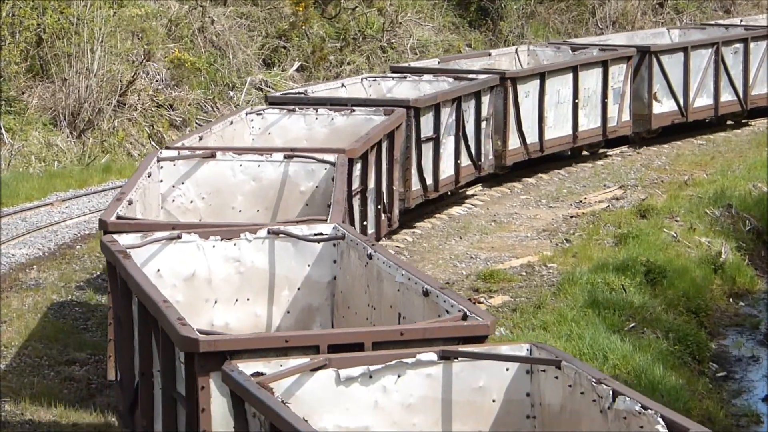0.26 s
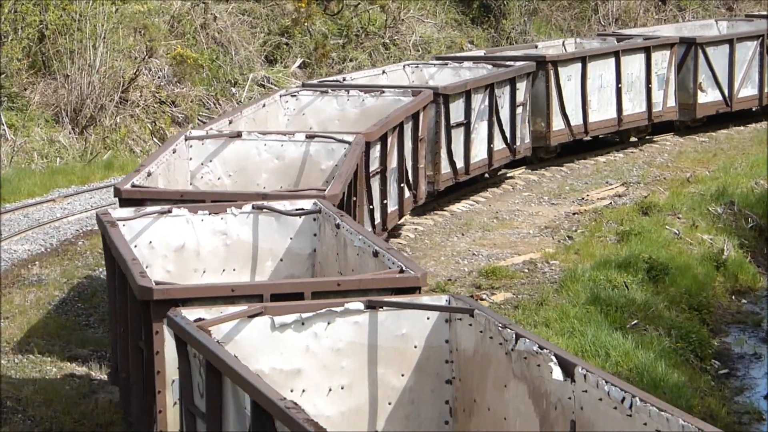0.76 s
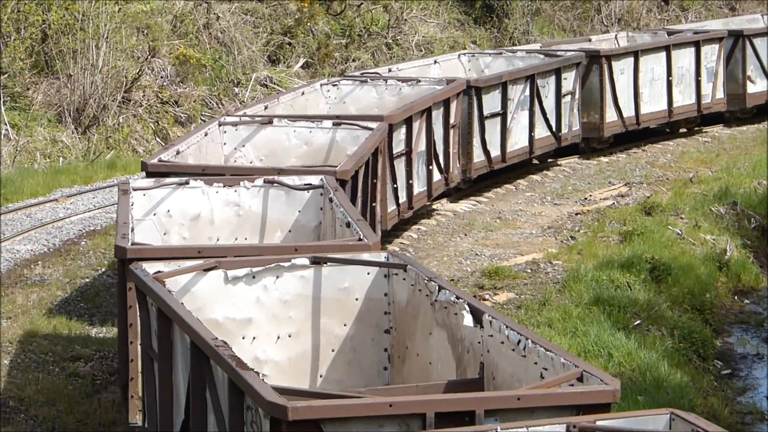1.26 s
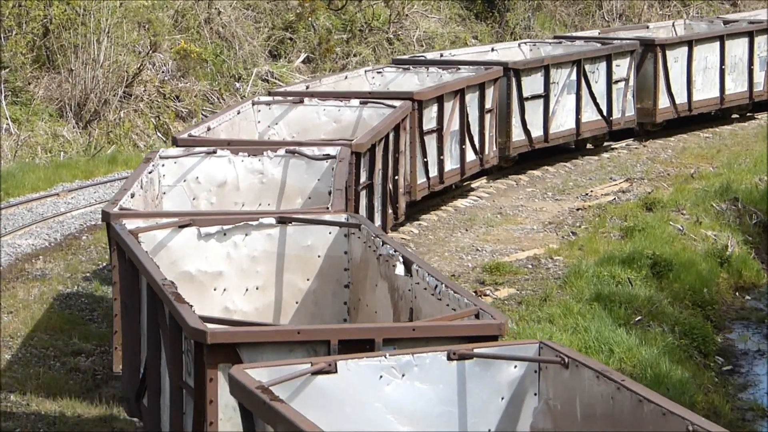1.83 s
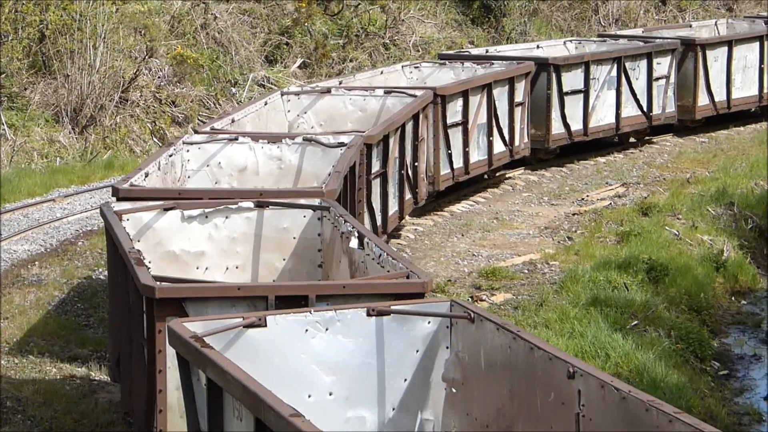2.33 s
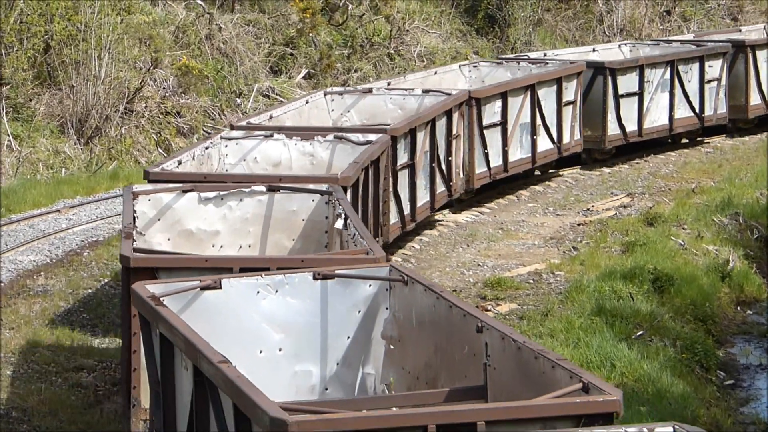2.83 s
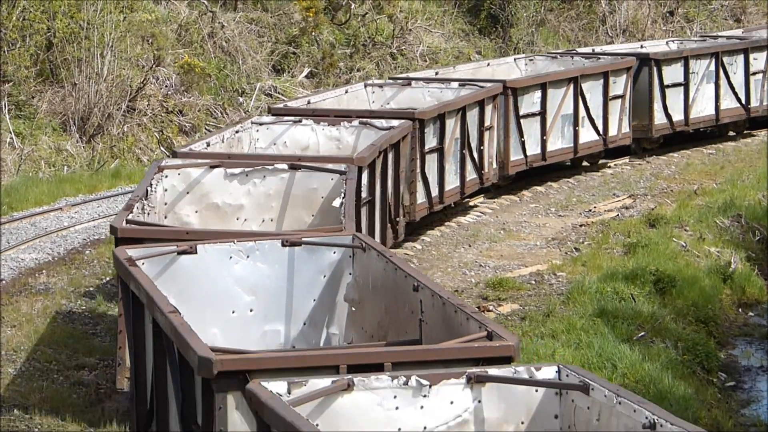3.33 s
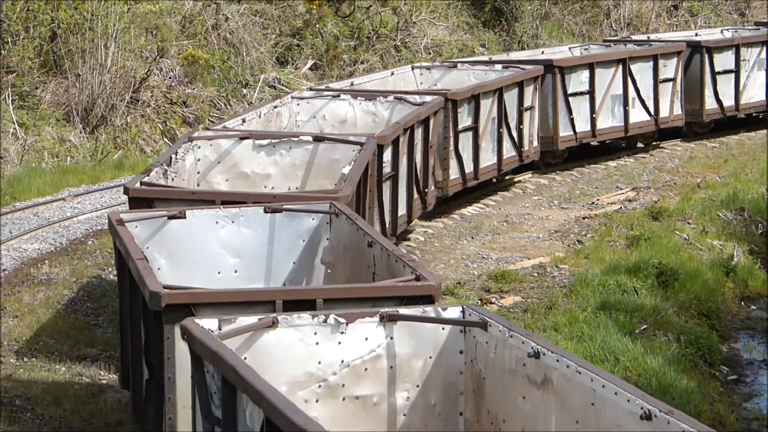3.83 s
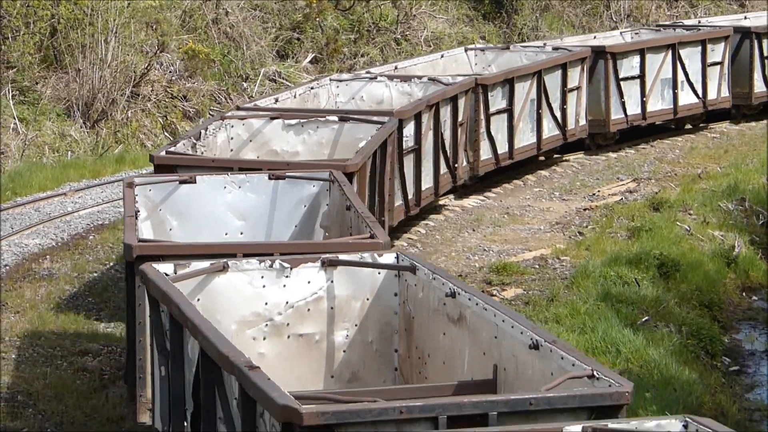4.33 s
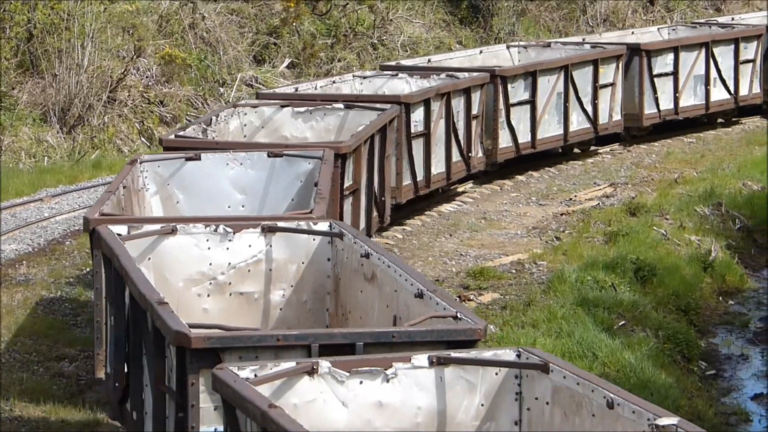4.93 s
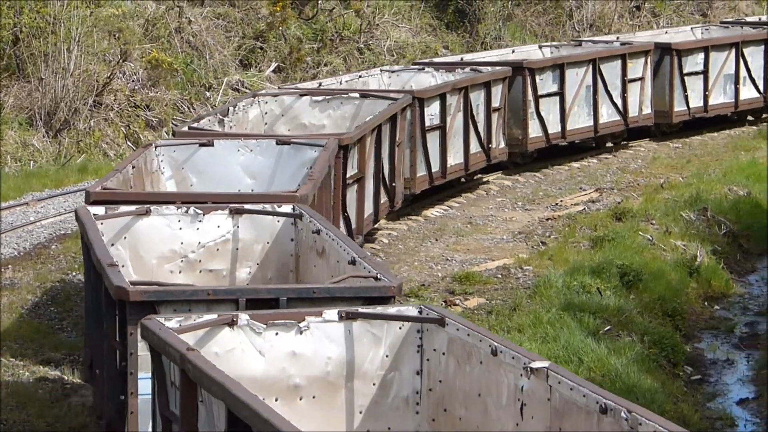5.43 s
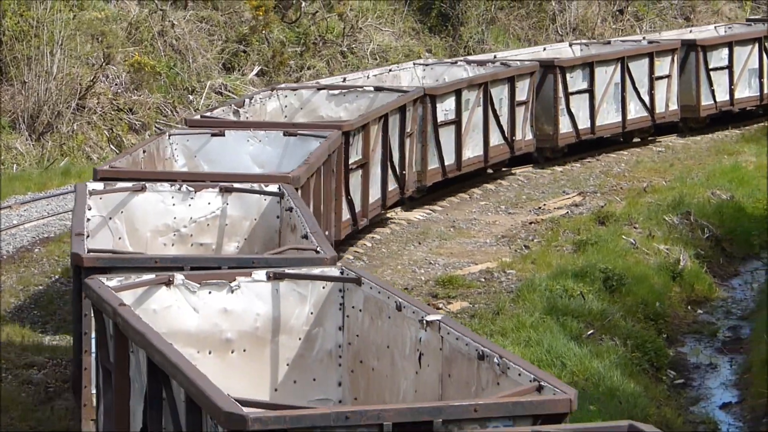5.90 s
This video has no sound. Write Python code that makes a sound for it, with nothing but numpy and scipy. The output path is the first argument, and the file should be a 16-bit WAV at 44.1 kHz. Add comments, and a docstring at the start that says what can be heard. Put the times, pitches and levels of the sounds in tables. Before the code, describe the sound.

Empty steel freight wagons clatter past close by, wheels roaring and ringing, loose plates and couplings clanking irregularly, with gusty wind buffeting the microphone.

```python
"""Empty hopper wagons on a curve

In the open air, a camera's two close microphone ports look down on steel hopper wagons a few metres below.
Wheels roar, ring and knock on the rails: random contacts and blows excite damped modes and coloured responses.
Jolts clank frames, plates and couplings, loose parts rattle and tick, and the empty bodies boom softly.
Flanges rub the rail in short, noisy bursts or sing faintly as gliding tones; shaped noise is the gusty wind.
"""
import sys
import numpy as np
from scipy import signal
from scipy.fft import rfft, irfft
from scipy.io import wavfile
from scipy.ndimage import uniform_filter1d, map_coordinates

SR = 44100
rng = np.random.default_rng(int(sys.argv[2]) if len(sys.argv) > 2 else 0)


def materialize(psi):
    """Save the field psi as 16-bit PCM at rate SR to the path in sys.argv[1].

    A 1-D psi becomes a single channel; in a 2-D psi each row is a channel.
    """
    bounded = np.clip(np.atleast_2d(psi).T, -1, 1)
    quanta = np.round(bounded * 32767).astype(np.int16)
    wavfile.write(sys.argv[1], SR, quanta)


N = 271656
TIME = np.arange(N) / SR


def undb(db):
    """Decibels to gain."""
    return 10 ** (np.asarray(db) / 20)


def unit(x):
    """Scale to rms 1."""
    return x / np.sqrt(np.mean(x ** 2))


def curves(table):
    """Each column after the first as a curve over time, joined by straight lines."""
    s, *columns = np.transpose(table)
    return [np.interp(TIME, s, column) for column in columns]


def fade(t, t60):
    """Exponential decay by 60 dB in t60 seconds."""
    return np.exp(-np.log(1000) * t / t60)


def walk(rate):
    """Smooth random wander of rms 1, drawn afresh rate times per second."""
    hold = int(SR / rate)
    steps = np.repeat(rng.standard_normal(N // hold + 1), hold)
    return unit(uniform_filter1d(steps, hold)[:N])


def pan(db):
    """Gains that make the left louder than the right by db."""
    return undb(np.array([[db], [-db]]) / 2)


def colour(points, size=2048):
    """Minimum-phase response of unit energy with the given spectrum."""
    hz, db = np.transpose(points)
    f = np.maximum(np.fft.rfftfreq(size, 1 / SR), 1)
    level_db = np.interp(np.log(f), np.log(hz), db)
    cepstrum = irfft(np.log(undb(level_db)))
    # folding the cepstrum onto positive time makes the response causal
    cepstrum[1:size // 2] *= 2
    cepstrum[size // 2 + 1:] = 0
    response = irfft(np.exp(rfft(cepstrum)))
    return response / np.linalg.norm(response)


def through(x, response):
    """Pass a sound through a response."""
    return signal.fftconvolve(x, response)[:N]


def contacts(rate, scatter_db):
    """Random metal-on-metal clicks, rate per second on average, of uneven size; rms 1."""
    struck = rng.random(N) < rate / SR
    size = undb(scatter_db * np.clip(rng.standard_normal(N), -2, 2))
    return unit(struck * size * rng.choice([-1, 1], N))


def flurries(rate, t60, steady_db):
    """Strength of a loose part that bounces at uneven gaps, each bounce a short cluster of contacts; rms 1."""
    gaps, sizes = rng.random((N // 100, 2)).T
    starts = (np.cumsum(.5 + gaps) * SR / rate).astype(int)
    bounces = np.bincount(starts, sizes ** 2)[:N]
    bounces = np.pad(bounces, (0, N - len(bounces)))
    power = np.abs(through(bounces, fade(TIME[:SR // 4], t60) ** 2))
    return unit(np.sqrt(power / power.mean() + undb(steady_db) ** 2))


def part(hz, db, ring_t60, ring_db, side_db, count=90):
    """Left and right response of one steel part: a crack, modes that ring on, scatter off the wagon walls."""
    t = TIME[:SR // 4]
    tone = colour(np.transpose([hz, db]))
    mode_hz = rng.uniform(hz[1], hz[-3], (count, 1))
    phase = 2 * np.pi * (mode_hz * t + rng.random((count, 1)))
    modes = np.sum(np.sin(phase), axis=0) * fade(t, ring_t60)
    mid = undb(ring_db) * unit(through(modes, tone)[:len(t)]) / np.sqrt(len(t))
    mid[:len(tone)] += tone  # the crack
    scatter = rng.standard_normal(len(t)) * fade(t, 0.048)
    side = undb(side_db) * unit(through(scatter, tone)[:len(t)])
    return (unit(mid) + np.array([side, -side])) / np.sqrt(len(t))


def steel(force, points, ring_t60, ring_db, side_db, patchy_db, count=8):
    """Several alike parts, each a little off the common colour, take turns to be struck."""
    hz, db = np.transpose(points)
    patches = patchy_db * rng.standard_normal((count, len(hz)))
    patches -= patches.mean(axis=0)
    struck = np.argmax([walk(rate=18) + .5 * rng.random(N) for _ in range(count)], axis=0)
    out = np.zeros((2, N))
    for k, patch in enumerate(patches):
        response = part(hz, db + patch, ring_t60, ring_db, side_db)
        out += signal.oaconvolve([force * (struck == k)], response, axes=1)[:, :N]
    return out


# rolling, before the gains of each layer: time_s, roar_db of the wheels, rattle_db of the loose parts
ROLLING = [(0.0, -25, -34.5), (0.12, -28.5, -34), (0.7, -31.5, -37), (0.94, -30, -37.5), (1.42, -32, -34),
           (1.58, -37, -41.5), (1.82, -37.5, -36), (2.26, -33.5, -35), (2.66, -33, -38), (3.0, -35, -37.5),
           (3.29, -35, -40), (3.71, -38, -43.5), (3.92, -36.5, -42), (4.15, -31.5, -37.5),
           (4.49, -28.5, -36), (4.99, -31.5, -37), (5.23, -31, -35.5), (5.41, -34.5, -40.5),
           (5.56, -31, -37), (6.16, -30, -37)]
# colour of the wheels: frequency_hz, relative level_db per Hz
WHEEL_COLOUR = [(400, -29), (640, -8), (710, -8), (850, 1.5), (950, 0), (1090, 1.5), (1280, -2),
                (1420, -4.5), (1650, -8), (1900, -13.5), (2470, -16), (4180, -100)]
# colour of the loose body plates: frequency_hz, relative level_db per Hz
PLATE_COLOUR = [(1120, -20.5), (1800, 0), (2000, 0.5), (2280, 4), (2600, -4), (2920, 3), (3250, 2.5),
                (3560, 4), (3950, -1), (4180, -3.5), (4410, -11), (4800, -5.5), (5200, -17.5), (6760, -58),
                (11400, -120)]
# colour of the loose chains: frequency_hz, relative level_db per Hz
CHAIN_COLOUR = [(3000, -30), (5200, 1.5), (6100, -2), (7000, 4), (7900, -4), (8800, -6), (10000, -36),
                (10700, -51), (14000, -50.5), (22000, -100)]
JINGLE_DB = -9  # chains relative to the rattle_db column


def wagons():
    """Rail roughness makes the wheels roar and keeps loose plates and chains rattling."""
    roar_db, rattle_db = curves(ROLLING)
    flurry = flurries(rate=32, t60=0.33, steady_db=1.5)  # plates and chains chatter together
    roar = undb(roar_db) * flurries(rate=24, t60=0.15, steady_db=3.5) * contacts(rate=7000, scatter_db=3.0)
    rattle = undb(rattle_db - 0.95) * flurry * contacts(rate=1300, scatter_db=0.0)
    jingle = undb(rattle_db + JINGLE_DB) * flurry * contacts(rate=5000, scatter_db=0.5)
    wheels = steel(roar, WHEEL_COLOUR, ring_t60=0.11, ring_db=-3.0, side_db=-10.5, patchy_db=1.0)
    plates = steel(rattle, PLATE_COLOUR, ring_t60=0.15, ring_db=-3, side_db=-8.5, patchy_db=0.5)
    chains = steel(jingle, CHAIN_COLOUR, ring_t60=0.073, ring_db=-2.0, side_db=-4.0, patchy_db=0.5, count=5)
    return wheels * pan(db=1.4) + plates * pan(db=-1.0) + chains * pan(db=0.5)


# ringing of the wheel discs, before its flutter: time_s, level_db
RINGING = [(0, -43), (.4, -34), (.8, -36.5), (1.2, -39.5), (1.5, -34.5), (1.7, -41.5), (2.05, -36.5),
           (2.4, -39), (3.0, -44), (3.7, -55), (4.18, -35.5), (4.27, -36.5), (4.7, -41), (5.1, -30),
           (5.4, -38.5), (5.7, -35.5), (6.16, -34.5)]
# modes of a wheel disc: pitch_hz before the drift, relative level_db
DISC_MODES = [(1040, -8), (1100, -1), (1265, -5.5), (1510, -12.5)]


def wheel_ring(ring_t60=0.045, drift=.035, flutter_db=0.4):
    """The rails keep the wheel discs ringing; the note drifts as one wheel after another comes nearest."""
    ring_db, = curves(RINGING)
    t = TIME[:SR // 4]
    modes = sum(undb(db) * np.sin(2 * np.pi * hz * t) for hz, db in DISC_MODES)
    note = modes * fade(t, ring_t60) * (1 - fade(t, 0.0048))
    ring = unit(through(contacts(rate=3000, scatter_db=1.0), note))
    # reading the ring at a wandering speed bends its pitch
    position = np.cumsum(1 + drift * walk(rate=7))
    drifting = map_coordinates(ring, [position], mode="mirror")
    return drifting * undb(ring_db + flutter_db * walk(rate=30))


# jolts of the wagons, before crest, snap and layer gains:
# start_s, build_up_s, t60_s, frames level_db, plates and couplings level_db
JOLTS = [(0.025, 0.016, 0.11, -20.5, -20.5), (0.129, 0.016, 0.36, -31.5, -33.5),
         (.32, 0.04, 0.25, -33, -29), (0.397, .015, 0.12, -29, -45), (.506, 0.033, 0.46, -27, -27),
         (0.538, 0.017, 0.14, -31, -33), (0.602, 0.017, 0.23, -26, -27.5), (.772, .008, 0.17, -31, -38),
         (0.805, 0.012, 0.47, -27.5, -27.5), (0.998, 0.003, 0.16, -34, -25.5),
         (1.157, 0.015, 0.087, -30, -34.5), (1.226, 0.0073, 0.52, -27.5, -30),
         (1.426, 0.011, 0.44, -29.5, -30.5), (1.489, 0.019, 0.31, -32, -34.5),
         (1.614, 0.0098, 0.16, -27, -28), (1.765, 0.014, 0.27, -35, -38.5), (1.903, 0.011, 0.34, -28, -30),
         (1.962, 0.0096, .25, -38, -39.5), (2.101, 0.018, .15, -33, -36), (2.177, 0.011, 0.3, -32, -30),
         (2.305, 0.02, 0.48, -35, -37), (2.365, 0.024, 0.24, -29.5, -30), (2.562, 0.01, 0.07, -25, -24),
         (2.701, 0.02, 0.17, -28, -41), (2.788, 0.006, 0.36, -24.5, -29.5),
         (2.873, 0.014, 0.17, -31, -32.5), (3.06, .008, 0.46, -37, -39), (3.171, 0.006, 0.1, -26.5, -27.5),
         (3.462, 0.006, 0.31, -39, -44), (3.665, 0.023, 0.14, -42, -43), (3.724, 0.012, 0.28, -31.5, -31),
         (3.929, .012, 0.31, -28.5, -28.5), (4.063, 0.014, 0.14, -24, -36.5),
         (4.113, 0.0045, 0.18, -27, -25), (4.23, 0.026, 0.16, -29, -37), (4.335, 0.011, 0.58, -27, -29.5),
         (4.525, 0.017, 0.31, -25.5, -28.5), (4.595, .012, 0.11, -33, -40),
         (4.712, 0.0057, 0.33, -26.5, -25), (4.807, 0.0055, 0.44, -25.5, -34.5),
         (5.165, 0.021, 0.22, -29, -39), (5.259, 0.015, 0.4, -35, -29.5), (5.454, 0.02, 0.32, -27, -29),
         (5.64, 0.0076, 0.67, -31.5, -29), (5.869, 0.011, 0.61, -28.5, -26.5),
         (5.95, 0.027, 0.66, -27, -28), (6.069, 0.013, 0.11, -27.5, -24), (6.138, 0.0098, .2, -39, -31.5)]
USUAL_RISE_S = .013
# a quicker slam: dB gained per halving of the build-up from USUAL_RISE_S
PLATE_SNAP_DB, COUPLING_SNAP_DB = -0.2, 1.5
# the slack stirs before each jolt: dB relative to the jolt, t60 of the swell in s
STIR_DB, STIR_T60_S = -11, 0.14


def jolts(crest_db=4, crest_t60=0.058):
    """Strength in frames, plates, couplings: slack stirs, is taken up, parts slam, chatter dies away."""
    power = np.zeros((3, N))
    for s, rise, t60, frame_db, loose_db in JOLTS:
        span = slice(max(int(s * SR) - SR // 8, 0), int(s * SR) + SR // 2)
        age = TIME[span] - s
        after = np.maximum(age - rise, 0)
        stir = undb(STIR_DB) * fade(np.maximum(-age, 0), STIR_T60_S)
        slam = np.minimum(age / rise, 1) * undb(crest_db * fade(after, crest_t60))
        shape = np.maximum(slam, stir) * fade(after, t60)
        snap = np.log2(USUAL_RISE_S / rise)
        strength = undb([frame_db, loose_db + PLATE_SNAP_DB * snap, loose_db + COUPLING_SNAP_DB * snap])
        power[:, span] += (strength[:, None] * shape) ** 2
    return np.sqrt(power)


def chatter(blow_s, gap_s=0.0055, rebound_db=-4.0, count=3):
    """A lumpy rush of contacts, plus one hard blow in each jolt and its ever weaker rebounds.

    The blow is worth blow_s seconds of the rush at the usual build-up, and more in a quicker slam.
    """
    blow, turn = np.zeros(N), np.arange(count)
    lateness = rng.random((len(JOLTS), count))
    for (s, rise, *_), late in zip(JOLTS, lateness):
        times = s + .6 * rise + gap_s * turn * (1 + late)
        at = np.minimum((times * SR).astype(int), N - 1)
        blow[at] = np.sqrt(blow_s * SR * USUAL_RISE_S / rise) * undb(rebound_db * turn)
    return flurries(rate=170, t60=0.022, steady_db=2) * contacts(rate=6000, scatter_db=0.0) + blow


# colour of the jolted frames: frequency_hz, relative level_db per Hz
FRAME_COLOUR = [(400, -31), (680, -6.5), (900, -6), (1100, -2), (1290, 5), (1420, -2.5), (1520, 0),
                (1650, -4), (2000, -12), (2600, -27), (4180, -100)]
# colour of the couplings: frequency_hz, relative level_db per Hz
COUPLING_COLOUR = [(3000, -29.5), (5200, -10), (6200, -4), (6900, 3.5), (7400, 2), (8000, -5), (8800, -9.5),
                   (10000, -16), (10700, -39), (14000, -67), (22000, -100)]


def clanks():
    """Each jolt rings the frames, the body plates and the couplings together."""
    frame_jolt, plate_jolt, coupling_jolt = jolts(crest_db=2.5, crest_t60=0.3)
    frame_force = undb(-2.0) * frame_jolt * chatter(blow_s=0.00082)
    plate_force = undb(-1.25) * plate_jolt * chatter(blow_s=0.0013)
    coupling_force = undb(-7.0) * coupling_jolt * chatter(blow_s=0.001)
    frames = steel(frame_force, FRAME_COLOUR, ring_t60=0.099, ring_db=-10, side_db=-12.0, patchy_db=1.5)
    plates = steel(plate_force, PLATE_COLOUR, ring_t60=0.14, ring_db=-3.5, side_db=-10.0, patchy_db=1.5)
    couplings = steel(coupling_force, COUPLING_COLOUR, ring_t60=0.15, ring_db=-2.5, side_db=-8.0,
                      patchy_db=3.5, count=10)
    return frames * pan(db=4.0) + plates * pan(db=-1.0) + couplings * pan(db=0.0)


# dull knocks of the wheels: start_s, level_db before gain_db, pitch_hz of the lower mode
WHEEL_KNOCKS = [(.332, -12.5, 1045), (.466, -16.5, 1050), (.519, -12.5, 1030), (.556, -15, 1070),
                (.759, -18.5, 1100), (.871, -18, 1060), (0.902, -16, 1070), (.997, -18, 1040),
                (1.119, -17, 1110), (1.442, -16, 1305), (1.945, -18, 1070), (2.096, -14.5, 1160),
                (2.116, -18, 1130), (2.188, -14, 1300), (2.413, -18, 1180), (2.441, -19.5, 1080),
                (2.531, -11, 1240), (2.703, -23, 1280), (3.174, -15, 1194), (3.466, -18.5, 1085),
                (4.071, -11.5, 1214), (4.719, -17, 1120), (4.816, -20, 1350), (5.008, -14, 1210),
                (5.192, -18, 1160), (5.741, -21, 1060)]
KNOCK_T60_S, BOUNCE_GAP_S = 0.19, .011  # decay of the chatter, mean gap between rebounds


def knocks(gain_db=-4, ring_t60=0.027, bounce_db=-3, bounce_rate=200, rebound_db=-3.0,
           upper_ratio=1.19, upper_db=-7, count=3):
    """A wheel drops onto the rail: a damped pair of modes, struck again by weaker rebounds and chatter."""
    out, t, turn = np.zeros(N + SR), TIME[:SR // 8], np.arange(count)
    for s, db, hz in WHEEL_KNOCKS:
        size = rng.uniform(-1, 1, len(t))
        blows = (rng.random(len(t)) < bounce_rate / SR) * size * undb(bounce_db) * fade(t, KNOCK_T60_S)
        gaps = BOUNCE_GAP_S * rng.uniform(.7, 1.3, count)
        times = np.cumsum(gaps) - gaps[0]  # the first blow falls at once
        blows[(times * SR).astype(int)] = undb(rebound_db * turn)
        lower = np.sin(2 * np.pi * hz * t)
        upper = undb(upper_db) * np.sin(2 * np.pi * hz * upper_ratio * t)
        note = (lower - upper) * fade(t, ring_t60) * (1 - fade(t, 0.0043))
        start = int(s * SR)
        out[start:start + len(t)] += undb(db + gain_db) * through(blows, note / note.max())[:len(t)]
    return out[:N] * pan(db=3.5)


# coupling links snapping taut: start_s, pitch_hz of the lower mode, level_db before the pan
LINK_SNAPS = [(.034, 7660, -29), (.54, 5900, -31), (.615, 4920, -39), (1, 6850, -31), (1.435, 7070, -34),
              (2.567, 6870, -32), (2.567, 2900, -29), (2.792, 5850, -36), (3.174, 6970, -30),
              (3.937, 7300, -37), (4.538, 7140, -28), (4.717, 7600, -37), (5.877, 6400, -37),
              (5.975, 6940, -31), (6.075, 3780, -29)]


def chinks(ring_t60=0.046, chatter_t60=0.093, upper_ratio=1.1, left_db=0.5):
    """A link snaps taut and chatters against its hook, ringing a close pair of modes."""
    out, t = np.zeros((2, N + SR)), TIME[:SR // 5]
    decay = fade(t, chatter_t60)
    for s, hz, db in LINK_SNAPS:
        blows = (rng.random(len(t)) < 700 / SR) * rng.standard_normal(len(t)) * decay
        phase = 2 * np.pi * (np.outer([hz, hz * upper_ratio], t) + rng.random((2, 1)))
        pair = np.sin(phase) * fade(t, ring_t60)
        lower, upper = (signal.fftconvolve(blows, mode)[:len(t)] for mode in pair)
        ring = np.array([lower + upper / 3, lower - upper / 3])  # the upper mode radiates sideways
        start = int(s * SR)
        out[:, start:start + len(t)] += undb(db) * unit(ring) * np.sqrt(np.mean(decay ** 2))
    return out[:, :N] * pan(db=left_db)


def ticks(rate=38, over_rattle_db=-8.5):
    """Single loose pins and door catches tick against the plates at random moments."""
    _, rattle_db = curves(ROLLING)
    force = undb(rattle_db + over_rattle_db) * contacts(rate=rate, scatter_db=1.5)
    return steel(force, PLATE_COLOUR, ring_t60=0.071, ring_db=-2, side_db=-9.5, patchy_db=3.5, count=6)


# flanges rubbing the rail: start_s, length_s, level_db at the middle
FLANGE_RUBS = [(1.1, 0.079, -38), (1.298, 0.059, -33.5), (1.46, 0.087, -32.5), (1.616, 0.031, -29),
               (2.87, 0.052, -44), (3.046, 0.055, -37), (5.722, 0.14, -38.5)]
# colour of the rubbing: frequency_hz, relative level_db per Hz
RUB_COLOUR = [(1500, -37), (2750, -15), (3100, -2), (3350, 0), (3600, 3.5), (3950, -16), (4600, -30),
              (8000, -59)]


def flange_rubs(grain_db=3):
    """Flanges rub the rail in short, noisy bursts around 3.3 kHz."""
    pressure = np.zeros(N)
    for s, length, db in FLANGE_RUBS:
        along = np.clip((TIME - s) / length, 0, 1)
        pressure += undb(db) * np.sin(np.pi * along)
    force = pressure * contacts(rate=900, scatter_db=grain_db)
    return steel(force, RUB_COLOUR, ring_t60=0.11, ring_db=-9, side_db=-15, patchy_db=0.0, count=4)


# flanges singing on the curve:
# start_s, length_s, pitch_hz at the middle before drift, glide_hz_per_s, level_db at the middle before flutter
FLANGE_SONGS = [(2.83, .12, 2210, 0, -41), (2.97, .06, 2920, 0, -40), (4.55, .11, 2970, -700, -40),
                (4.8, .17, 3030, -600, -37.5), (5.01, .11, 2160, 800, -37), (5.2, .17, 2220, -1300, -41),
                (5.48, .13, 2912, -300, -39), (5.635, .055, 2850, -900, -32), (5.68, .1, 3130, 900, -39.5),
                (5.85, .08, 3260, 300, -39), (5.97, .11, 2900, 0, -39)]


def flange_songs():
    """A flange rubs the rail and a wheel mode swells, glides and flutters."""
    out = np.zeros(N)
    drift = 1 + .007 * walk(rate=90)
    flutter = undb(-1.5) * unit(undb(3.5 * walk(rate=140)))
    for s, length, hz, glide, db in FLANGE_SONGS:
        along = np.clip((TIME - s) / length, 0, 1)
        pitch = (hz + glide * length * (along - .5)) * drift
        out += undb(db) * np.sin(np.pi * along) * np.sin(2 * np.pi * np.cumsum(pitch) / SR)
    return np.sqrt(2) * out * flutter


# colour of the empty bodies: frequency_hz, relative level_db per Hz
BODY_COLOUR = [(18, -27), (30, -19.5), (53, -38), (90, -14), (156, -2), (220, -2.5), (310, 1.5), (516, 0),
               (720, -4.5), (940, -29.5), (1580, -100)]
# level at USUAL_ROAR_DB, dB gained per dB of roar, dB relative to a jolt of the frames
DRONE_DB, DRONE_SLOPE, BOOM_DB = -37.3, 0.64, -13
USUAL_ROAR_DB = -31


def drone(sway_db=0.77):
    """The big empty bodies boom softly as they roll, and a little more at each jolt."""
    roar_db, _ = curves(ROLLING)
    rolling = undb(DRONE_DB + DRONE_SLOPE * (roar_db - USUAL_ROAR_DB) + sway_db * walk(rate=14))
    frame_jolt, _, _ = jolts()
    force = np.hypot(rolling, undb(BOOM_DB) * frame_jolt) * contacts(rate=2500, scatter_db=1.5)
    return steel(force, BODY_COLOUR, ring_t60=0.28, ring_db=-14.5, side_db=-7.0, patchy_db=0.4, count=5)


# the breeze builds up, drops suddenly and partly returns: time_s, level_db before the eddies
BREEZE_LEVEL = [(0, -43), (.8, -36), (1.25, -30), (1.5, -31), (1.62, -21), (1.8, -27.5), (1.95, -32.5),
                (2.25, -33.5), (2.5, -28), (2.7, -37), (2.85, -24.5), (3.5, -21.5), (3.76, -22), (3.9, -47),
                (4.85, -51), (5.05, -29.5), (5.7, -47.5), (6.16, -34)]
# single puffs of wind: peak_s, level_db at the peak
WIND_PUFFS = [(.56, -32), (.9, -26.5), (1.08, -34), (1.22, -37), (1.42, -22.5), (2.07, -24), (2.35, -24),
              (2.6, -22), (3.19, -23), (4.31, -32), (4.73, -32), (4.94, -23), (5.3, -24.5), (5.52, -27.5),
              (5.83, -26), (6.09, -25.5)]
# colour of the pressure opposed at the two ports: frequency_hz, relative level_db per Hz
OPPOSED_COLOUR = [(18, -53), (30, -40), (55, -36), (90, -19.5), (157, -1), (260, 1), (450, -5), (874, -19),
                  (1780, -32), (3000, -50), (6600, -100)]
# colour of the pressure common to both ports: frequency_hz, relative level_db per Hz
COMMON_COLOUR = [(18, -18), (45, -25), (90, -3.5), (160, 3.5), (260, -5.5), (500, -26), (1500, -60)]
EDDY_DB, EDDY_RATE = 3, 18  # flutter of the breeze: spread, changes per s
PUFF_WIDTH_S = .028  # standard deviation of the bell shape


def wind(common_db=-25):
    """Eddies press on the two close ports in opposition; only a little deep buffeting is common to both."""
    breeze_db, = curves(BREEZE_LEVEL)
    breeze = undb(breeze_db + EDDY_DB * walk(rate=EDDY_RATE))
    puffs = sum(undb(db) * np.exp(-.5 * ((TIME - s) / PUFF_WIDTH_S) ** 2) for s, db in WIND_PUFFS)
    strength = np.hypot(breeze, puffs)
    opposed = through(strength * rng.standard_normal(N), colour(OPPOSED_COLOUR))
    common = through(strength * rng.standard_normal(N), colour(COMMON_COLOUR))
    return opposed * np.array([[1], [-1]]) + undb(common_db) * common


def scene():
    """The train and the wind, as they reach the two ports."""
    rolling = wagons() + wheel_ring() + drone() + flange_rubs() + flange_songs()
    jolting = clanks() + knocks() + chinks() + ticks()
    return rolling + jolting + wind()


TOP_HZ = 10600


def record(dry):
    """The camera steeply cuts the treble above TOP_HZ."""
    low_pass = signal.ellip(8, .2, 80, TOP_HZ, fs=SR, output="sos")  # 0.2 dB ripple, 80 dB stopband
    return signal.sosfilt(low_pass, dry)


dry = scene()
out = record(dry)
materialize(out)
```